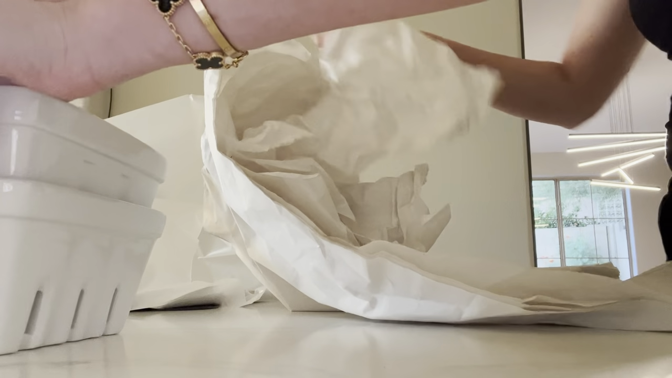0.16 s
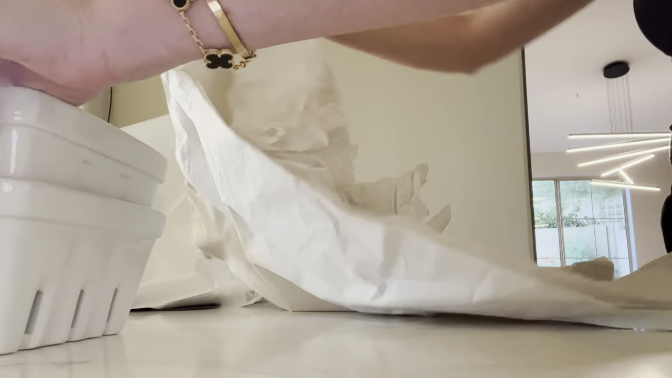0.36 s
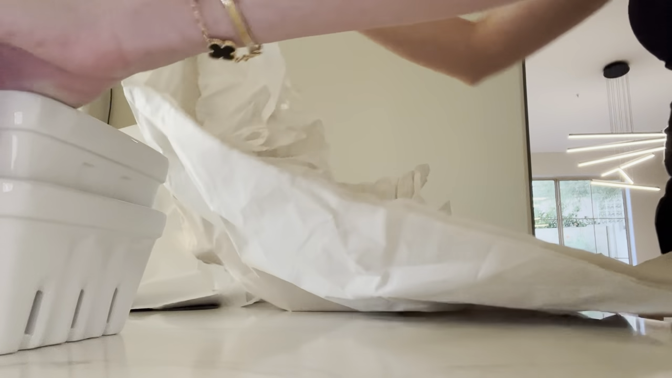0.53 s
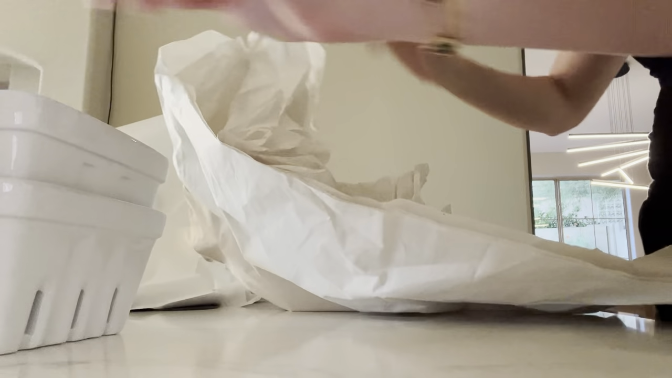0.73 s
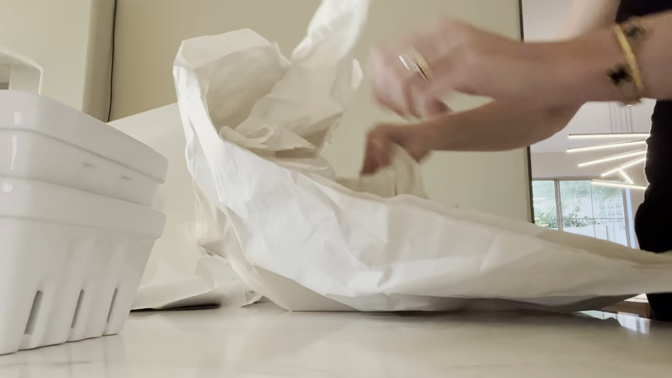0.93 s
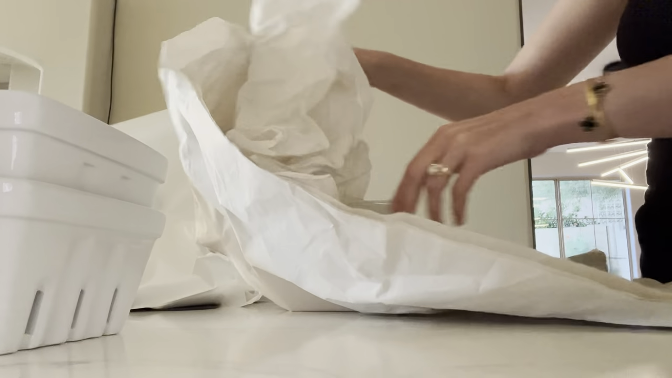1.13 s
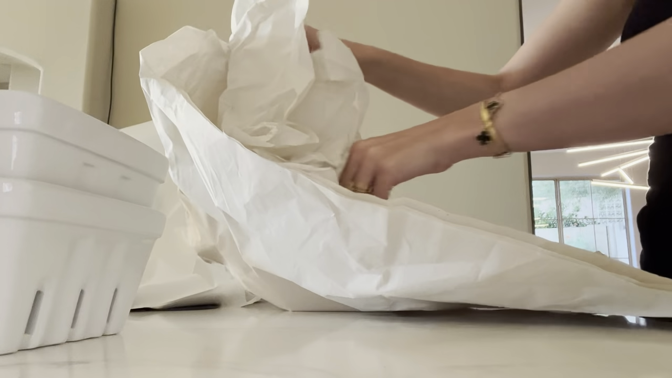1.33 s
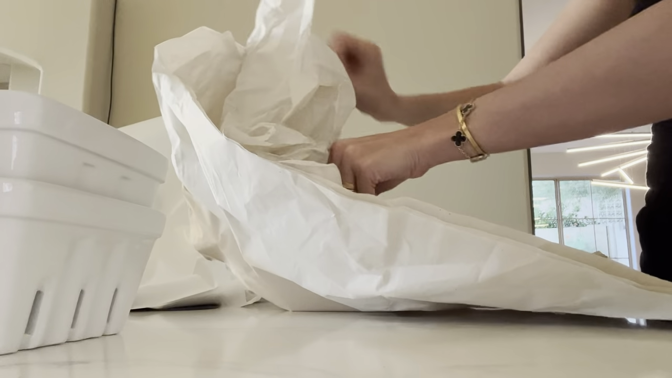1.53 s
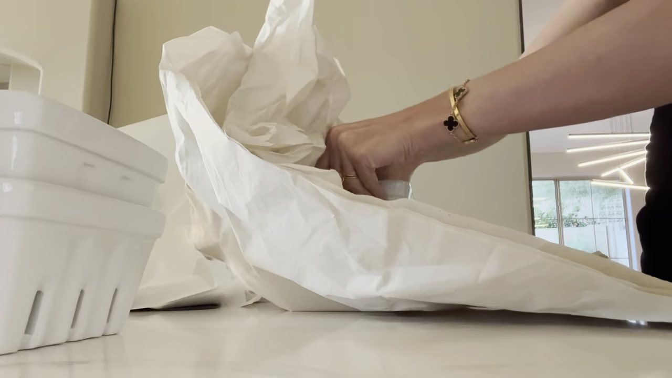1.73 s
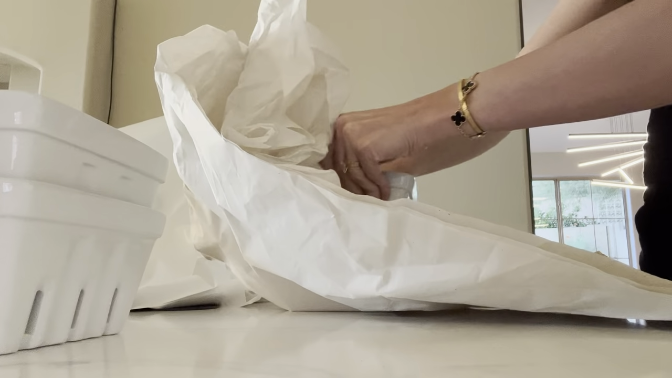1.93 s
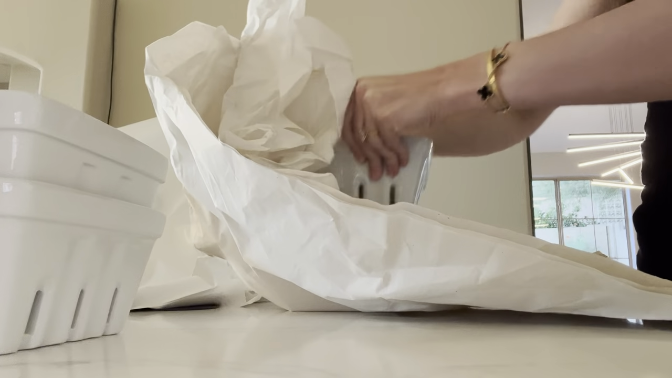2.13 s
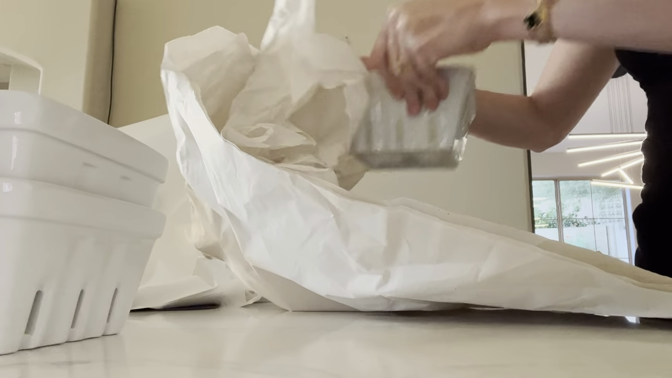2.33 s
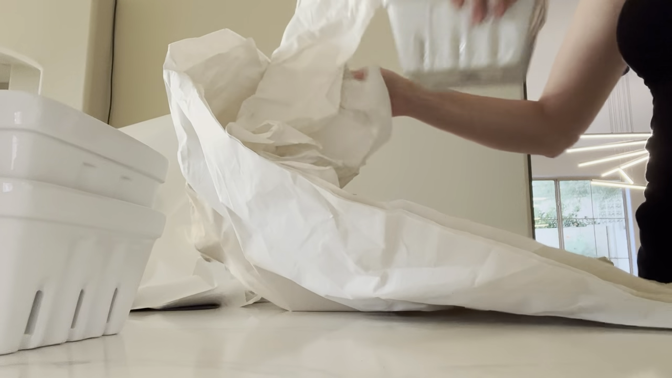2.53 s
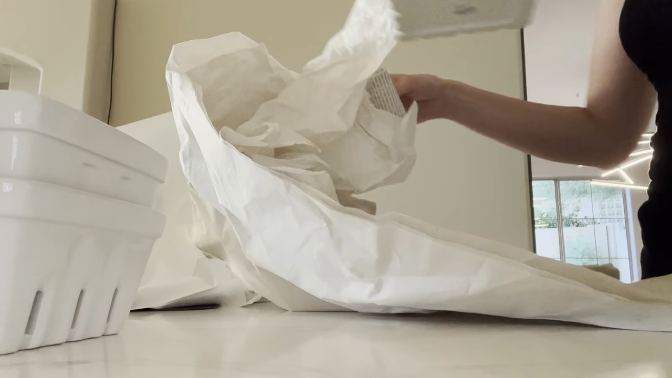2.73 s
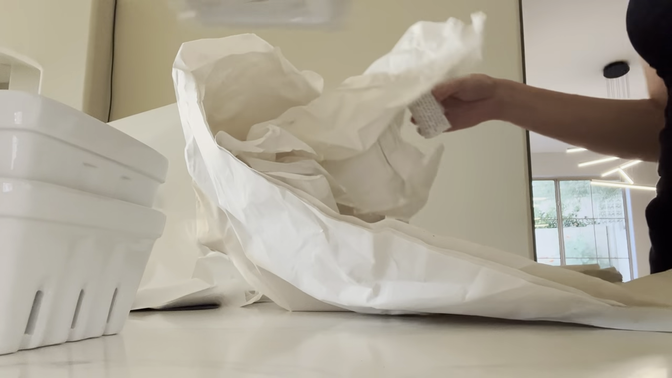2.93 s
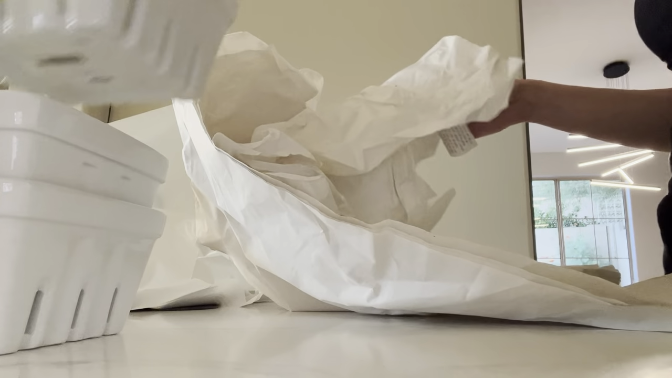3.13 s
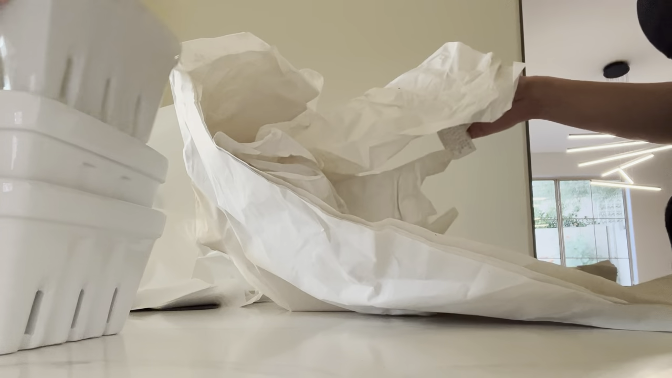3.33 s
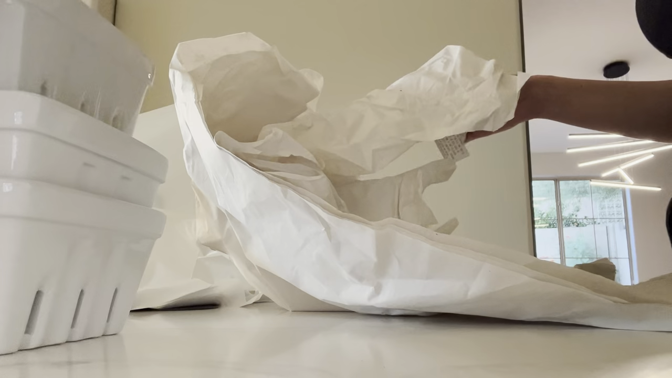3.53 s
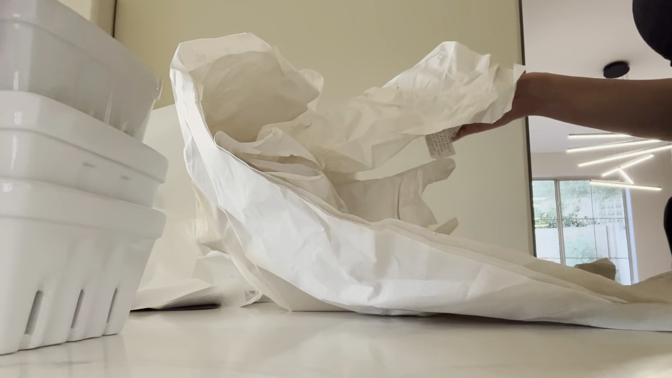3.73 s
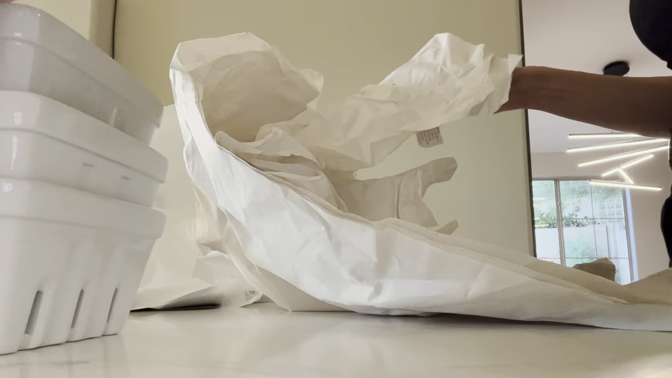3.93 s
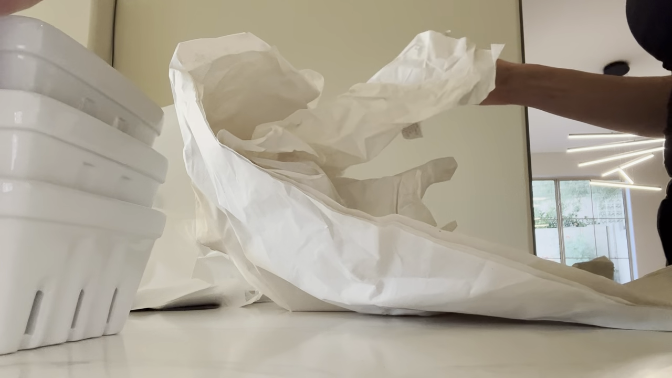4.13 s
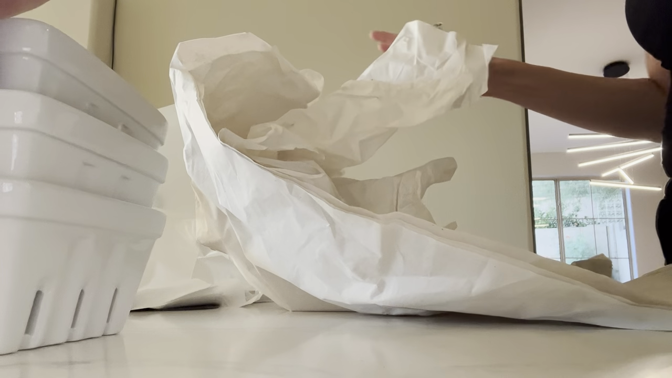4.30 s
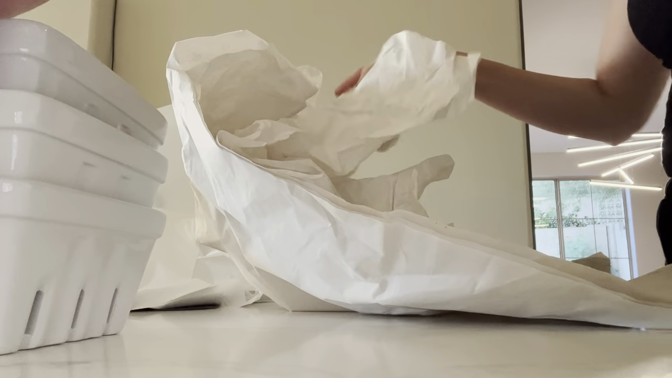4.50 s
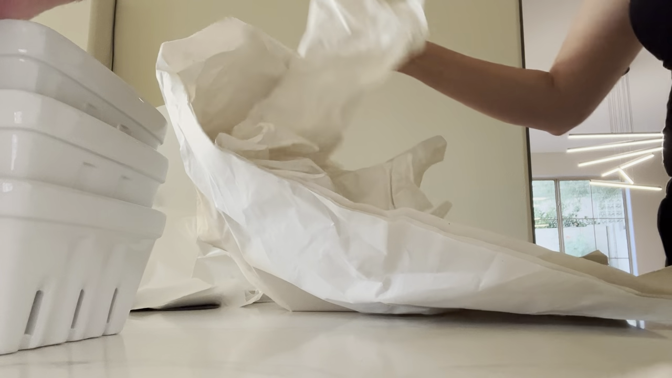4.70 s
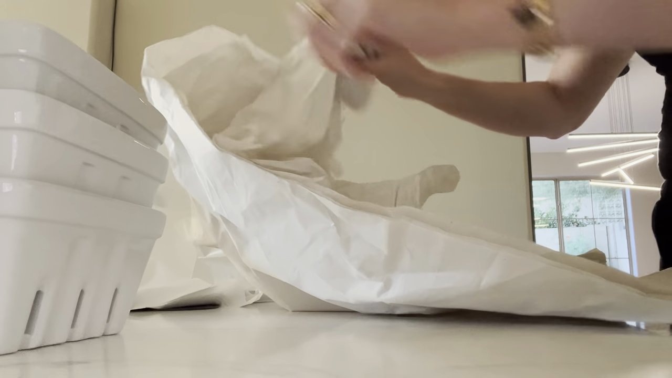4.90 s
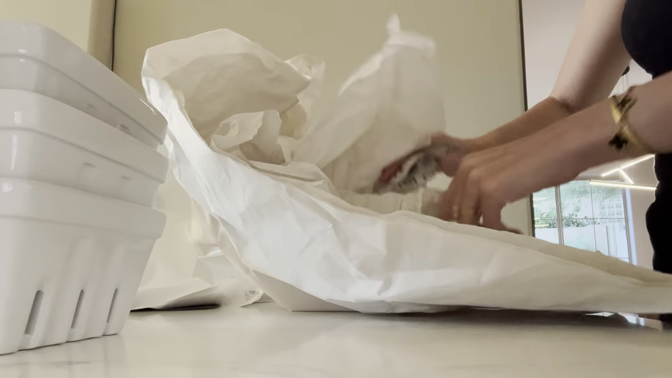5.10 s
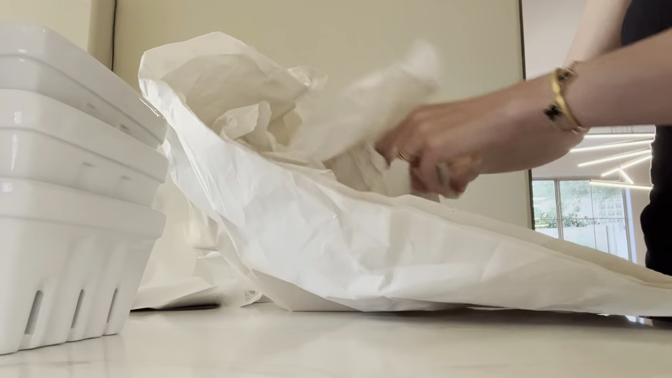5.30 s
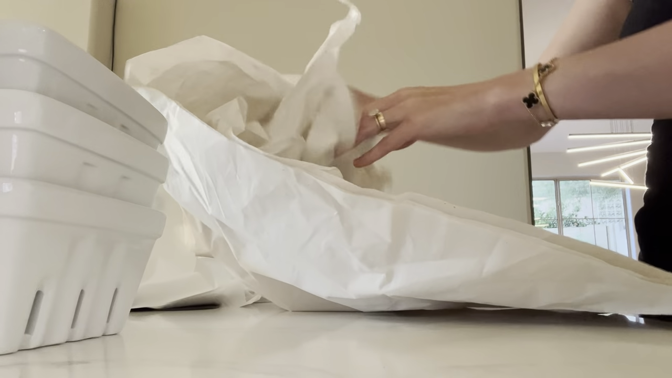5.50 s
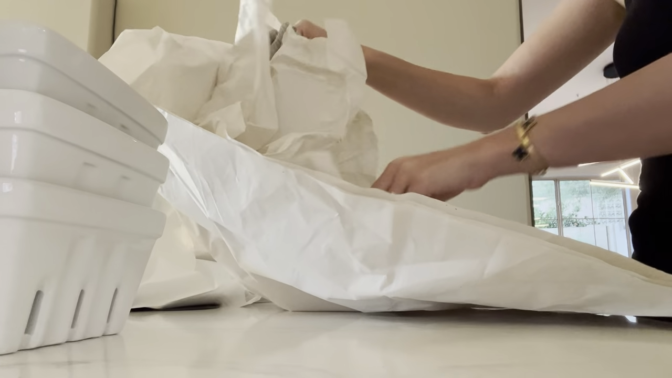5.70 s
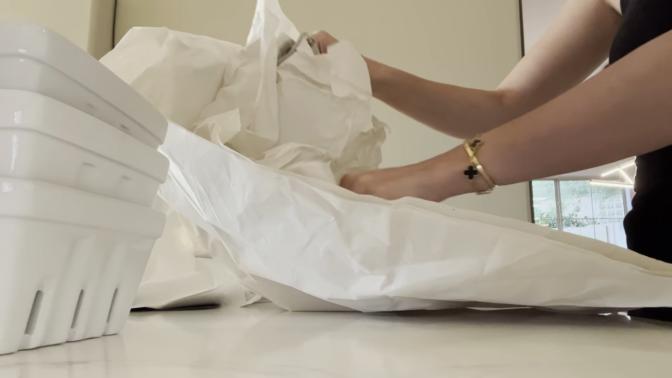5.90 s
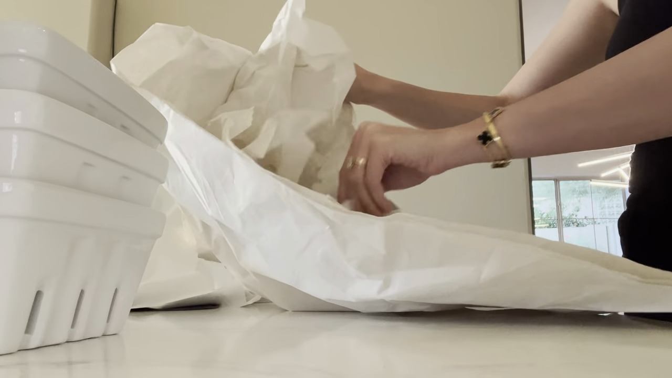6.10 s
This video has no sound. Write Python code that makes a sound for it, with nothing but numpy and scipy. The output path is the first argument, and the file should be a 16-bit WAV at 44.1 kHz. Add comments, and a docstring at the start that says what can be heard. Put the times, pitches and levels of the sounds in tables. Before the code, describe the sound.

Indoors, close to a counter: a loud ceramic knock with a quick rattle, a short stuttering squeak of a pushed basket, and crisp crumpling of big stiff paper slightly farther away. The rustle fades to faint ticks, a second basket lands and nests with ringing double clacks, then vigorous crackling returns. Low room rumble and live echo throughout.

```python
"""A glazed ceramic basket knocks on a stone counter while hands already pull and crumple big paper sheets.
Creases buckle in swarms of clicks, sheets slide, taut folds snap; a pushed basket squeaks by stick and slip.
Loose folds then flop in steps and light rubs hiss. Near 4 s a second basket lands and nests in a stack, its
modes ringing over a thud, and the paper works up to its loudest. A hard live room and low noise lie throughout.
A phone standing on the counter picks it all up at two ports."""
import sys
import numpy as np
from scipy import signal
from scipy.fft import rfft, irfft
from scipy.io import wavfile
from scipy.ndimage import uniform_filter1d

SR = 44100
rng = np.random.default_rng(int(sys.argv[2]) if len(sys.argv) > 2 else 0)


def log_audio(samples):
    """Write samples as a 16-bit WAV file to the path given in sys.argv[1]."""
    # one column per channel
    frames = np.atleast_2d(samples).T
    # limit to full scale, then quantise
    limited = np.clip(frames, -1, 1)
    pcm = np.round(limited * 32767).astype(np.int16)
    wavfile.write(sys.argv[1], SR, pcm)


N = 271211
TIME_S = np.arange(N) / SR


def gain_of(db):
    """Decibels to an amplitude factor."""
    return 10 ** (np.asarray(db) / 20)


def evened(x):
    """Scales to rms 1."""
    return x / np.sqrt(np.mean(x ** 2) + 1e-20)


def read(points, hz):
    """Interpolates a table on a log-frequency axis."""
    f, value = np.transpose(points)
    return np.interp(np.log(hz + 1), np.log(f + 1), value)


def add(mix, start_s, sound):
    """Mixes a sound in at start_s."""
    part = mix[max(round(start_s * SR), 0):][:len(sound)]
    part += sound[:len(part)]


def colour(x, points, size=4096):
    """Causal minimum-phase filter with the given spectrum: clicks keep their sharp front."""
    hz = abs(np.fft.fftfreq(size, 1 / SR))
    log_gain = np.log(gain_of(read(points, hz)))
    spectrum = np.exp(np.conj(signal.hilbert(log_gain)))
    taps = np.fft.ifft(spectrum).real[:size // 2]
    return signal.oaconvolve(x, taps)[:len(x)]


def band(x, low_hz, high_hz, order=3):
    """Butterworth band-pass."""
    edges_hz = [low_hz, min(high_hz, SR / 2 - 1)]
    return signal.sosfilt(signal.butter(order, edges_hz, "band", fs=SR, output="sos"), x)


def burst(t60_s, size=2048):
    """A puff of noise of energy 1 that dies away."""
    puff = rng.standard_normal(size) * gain_of(-60 * np.arange(size) / SR / t60_s)
    return puff / np.linalg.norm(puff)


def wander(size, rate_hz=60):
    """Slow random curve of rms about 1: low-passed noise, filter onset cut off."""
    lowpass = signal.butter(2, rate_hz, fs=SR, output="sos")
    return evened(signal.sosfilt(lowpass, rng.standard_normal(size + SR)))[-size:]


# quiet rumble of the house: f/Hz, relative density/dB per Hz
RUMBLE_SPECTRUM = [(20, -23), (40, -18.5), (60, -1), (80, 1), (105, -2), (150, -9), (215, -4.5),
                   (300, -13.5), (500, -22.5), (1000, -32), (2000, -30.5), (4000, -42), (8000, -63),
                   (15000, -68)]
RUMBLE_MID_RMS_DB = -47.5


def rumble(apart=0.34):
    """Low steady noise of the house, nearly the same at both ports."""
    mid, side = (evened(colour(noise, RUMBLE_SPECTRUM)) for noise in rng.standard_normal((2, N)))
    return gain_of(RUMBLE_MID_RMS_DB) * np.array([mid + apart * side, mid - apart * side])


def buckles(per_s, spread_db, t60_s, rub, clump_db, width, shift_db, count=48):
    """Creases give way in clumps, each facet ringing in its own band, over the smooth noise of rubbing."""
    struck = rng.random(N) < per_s / SR
    size = gain_of(spread_db * np.minimum(rng.exponential(1, N), 4)) * struck
    facet = rng.integers(0, count, N)
    clumps, *turns = (wander(size=N, rate_hz=30) for _ in range(9))
    clicks = np.zeros(N)
    for k, hz in enumerate(np.geomspace(180, 15000, count)):
        # small and large facets take turns, in groups of neighbouring pitch
        turn = turns[k * len(turns) // count]
        hits = size * (facet == k) * gain_of(shift_db * turn)
        ring = band(burst(t60_s), hz / (1 + width), hz * (1 + width), order=2)
        clicks += signal.oaconvolve(hits, ring)[:N]
    rubbing = rub * rng.standard_normal(N)
    return evened((evened(clicks) + rubbing) * gain_of(clump_db * clumps))


# pulls and squeezes of the paper, levels before the trims in paper():
# t/s, length/s, crinkle level/dB, flex re crinkle/dB, slide re crinkle/dB
GRIPS = [(0.0, 0.23, -47.5, 10.5, -7.5), (0.242, 0.12, -45.5, 5.5, -3), (0.348, 0.14, -40, 2.5, -4),
         (0.617, 0.053, -47, -4, -1.5), (0.75, 0.2, -43, 0.5, -2.5), (0.993, 0.1, -41.5, 4, 2.5),
         (1.096, 0.1, -43, 1, -9), (1.334, 0.12, -50, 5, -2), (1.506, 0.16, -48.5, 2, -5.5),
         (1.723, 0.027, -49, 3, -2), (1.848, 0.074, -46, 1, -2), (1.923, 0.24, -45.5, 2.5, -4),
         (2.089, 0.096, -40.5, 4.5, -3), (2.258, 0.28, -54, 3.5, 1), (2.55, 0.04, -58, 1, -4.5),
         (2.627, 0.14, -57.5, 3.5, -4), (2.78, 0.15, -54.5, 1, -2), (2.956, 0.098, -60, 6, -3.5),
         (3.105, 0.093, -58, 2.5, -2), (3.25, 0.12, -59.5, 4, -6), (3.688, 0.076, -52.5, -3.5, -3),
         (3.768, 0.15, -63, 4.5, 1.5), (3.947, 0.11, -49.5, 3, -1), (4.288, 0.26, -50, 5, -0.5),
         (4.6, 0.25, -48, 2, 1), (4.865, 0.12, -41, 3, -3.5), (4.988, 0.17, -41.5, 2.5, -7),
         (5.158, 0.096, -40.5, 3, -4.5), (5.289, 0.083, -42, 3, -2.5), (5.363, 0.22, -37, 4, -3),
         (5.586, 0.088, -37.5, 1.5, -7.5), (5.81, 0.099, -43, 3.5, -6.5), (5.94, 0.052, -45.5, 8.5, -3.5),
         (5.996, 0.2, -40, 3, -6)]
GRIP_ATTACK_S = 0.036  # time for the hand to close


def handling(levels_db, release_db_per_s):
    """Envelope of all grips: rises as the hand closes, holds, dies away as the sheet settles."""
    power = np.zeros(N)
    for (start_s, length_s, *_), db in zip(GRIPS, levels_db):
        rise = np.clip((TIME_S - start_s) / GRIP_ATTACK_S, 0, 1)
        since_release_s = np.maximum(TIME_S - start_s - length_s, 0)
        power += (rise * gain_of(db - release_db_per_s * since_release_s)) ** 2
    return np.sqrt(power)


# a buckling sheet: f/Hz, relative density/dB per Hz
PAPER_SPECTRUM = [(60, -21.5), (150, 0.5), (250, -1), (450, -3), (700, -2), (1000, -0.5), (1500, -2),
                  (2000, -5.5), (2700, -5), (4000, -4), (5000, -9), (6700, -12), (9000, -17.5),
                  (13500, -19), (15500, -42)]


def paper(flex_trim_db=-2, crinkle_trim_db=-1, slide_trim_db=0):
    """Large facets flap low, small creases crinkle, and sliding fibres fizz."""
    _, _, grip_db, flex_db, slide_db = np.transpose(GRIPS)
    creases = buckles(per_s=4500, spread_db=4.0, t60_s=0.011, rub=0.34, clump_db=1.1, width=0.4, shift_db=2.0)
    creases = colour(creases, PAPER_SPECTRUM)
    fibres = buckles(per_s=7200, spread_db=2.0, t60_s=0.0038, rub=0.92, clump_db=1.5, width=0.62, shift_db=2.7)
    fibres = colour(fibres, PAPER_SPECTRUM)
    flex = evened(band(creases, 103, 2680))
    flex *= handling(grip_db + flex_db + flex_trim_db, release_db_per_s=96.5)
    crinkle = evened(band(creases + 0.71 * fibres, 2545, 7100))
    crinkle *= handling(grip_db + crinkle_trim_db, release_db_per_s=117.0)
    slide = evened(band(fibres, 7600, 17400))
    slide *= handling(grip_db + slide_db + slide_trim_db, release_db_per_s=92)
    return flex + crinkle + slide


# blows: t/s, row of BASKET_MODES, ring level/dB, contact hardness/Hz,
# clack level/dB, counter thud level/dB, thud f/Hz, thud t60/s
KNOCKS = [(0.002, 0, -13.5, 4180, -4.5, -19, 158, 0.04), (0.0156, 0, -22.5, 7000, -13.5, -14, 160, 0.06),
          (0.038, 0, -25, 1500, -13, -18.5, 157, 0.043), (0.0543, 0, -39, 4000, -24, -40, 156, 0.034),
          (0.066, 0, -38, 3000, -28, -42, 156, 0.036), (3.9819, 1, -23.5, 6850, -17, -28, 277, 0.025),
          (4.0278, 1, -20, 1340, -12, -19.5, 427, 0.04), (4.2736, 2, -18, 1510, -7, -5.5, 702, 0.016),
          (4.278, 2, -20.5, 6850, -9.5, -8.5, 240, 0.02), (4.5455, 2, -39, 1520, -22.5, -14, 257, 0.028)]
# rows: first basket, second basket, nested stack; modes: f/Hz, relative level/dB, t60/s
BASKET_MODES = [
    [(568, -3, 0.076), (694, 7, 0.034), (975, 14, 0.012), (1330, -13, 0.11), (1800, 1.5, 0.05),
     (2449, 2, 0.12), (2606, -2, 0.18), (3155, -0.5, 0.059), (4075, -11, 0.16), (4447, -17, 0.2),
     (5012, -22, 0.32), (5660, -2, 0.13), (10180, -10, 0.19)],
    [(161, -10, 0.098), (579, 3.5, 0.037), (701, -4, 0.059), (800, 2, 0.028), (877, 1.5, 0.032),
     (1550, -2, 0.14), (1980, -11, 0.07), (2480, -11, 0.06), (2550, 0.5, 0.14), (2940, -0.5, 0.13),
     (4070, -10.5, 0.13), (4180, -19, 0.05), (5070, -14.5, 0.18), (5300, -9, 0.06), (5860, -8, 0.08),
     (8050, -17, 0.09), (9450, -17, 0.1)],
    [(205, 1, 0.077), (275, -0.5, 0.064), (433, 0, 0.035), (501, 10, 0.039), (565, 4, 0.042),
     (729, 2, 0.059), (833, 7, 0.038), (1130, -8, 0.022), (1156, -4, 0.023), (1558, 0.5, 0.059),
     (1800, 1.5, 0.065), (1976, 2, 0.07), (2513, 0.5, 0.062), (2617, 7.5, 0.05), (2740, 1, 0.04),
     (2915, 5.5, 0.091), (3030, -3, 0.027), (4070, -12, 0.16), (5000, -16, 0.04), (5160, -6, 0.045),
     (5660, -8, 0.038), (6400, -7, 0.091)],
]
# dull clack of ceramic on a hard base: f/Hz, relative density/dB per Hz
CLACK_SPECTRUM = [(50, -35), (170, 0), (270, 2), (370, -2.5), (600, 0.5), (850, 2), (1200, -8.5),
                  (2000, -8.5), (2800, -8), (3400, -14.5), (5500, -15.5), (7500, -11), (14000, -18)]
SLAB_HZ, SLAB_T60_S, SLAB_RE_THUD_DB = 76.8, 0.45, -19.5  # boom of the counter slab


def knocks(clack_t60_s=0.044, settle_s=0.00059, chatter=0.0047, chatter_db=2.5):
    """Blows ring basket modes and thud the counter; soft contact weakens high modes, rocking unsettles them."""
    out, t = np.zeros(N), np.arange(SR // 2) / SR
    press = 1 - np.exp(-(t / settle_s) ** 2)  # rough faces take a moment to meet fully
    for start_s, basket, ring_db, hard_hz, clack_db, thud_db, thud_hz, thud_t60_s in KNOCKS:
        ring = np.zeros(len(t))
        for k, (hz, db, t60_s) in enumerate(BASKET_MODES[round(basket)]):
            rocking = wander(size=len(t))
            # neighbouring modes start in opposite directions
            turns = np.cumsum(hz * (1 + chatter * rocking)) / SR + k / 2
            level = gain_of(db + chatter_db * rocking - 60 * t / t60_s)
            ring += level * np.sin(2 * np.pi * turns) / (1 + (hz / hard_hz) ** 2)
        softness = signal.butter(2, min(hard_hz, SR / 3), fs=SR, output="sos")
        noise = press * burst(clack_t60_s, size=len(t))
        clack = signal.sosfilt(softness, colour(noise, CLACK_SPECTRUM))
        thud = np.sin(2 * np.pi * thud_hz * t) * gain_of(-60 * t / thud_t60_s)
        thud += np.sin(2 * np.pi * SLAB_HZ * t) * gain_of(SLAB_RE_THUD_DB - 60 * t / SLAB_T60_S)
        blow = press * (gain_of(ring_db) * ring + gain_of(thud_db) * thud)
        add(out, start_s, blow + gain_of(clack_db) * clack / abs(clack).max())
    return band(out, 93.0, 15000, order=2)


# single creases that snap, levels before the trims in snaps():
# t/s, tick level/dB, flap level/dB, fold f/Hz
SNAPS = [(0.1026, -33.5, -44, 3000), (0.256, -37, -36, 3000), (0.2752, -32.5, -34, 4500),
         (0.3026, -34.5, -39, 3000), (0.3756, -31, -41, 2500), (0.395, -32, -26, 1500),
         (0.423, -29, -43, 3000), (1.0012, -47, -46, 3000), (1.0287, -18.5, -43, 3000),
         (1.037, -38, -33, 3200), (1.1282, -36, -22.5, 1300), (1.3351, -47, -30.5, 2870),
         (1.3484, -29, -46, 3000), (1.371, -27, -50, 3020), (1.624, -39, -31, 1420), (1.709, -50, -29, 890),
         (1.7453, -44, -28.5, 2470), (1.893, -41, -31.5, 3340), (1.942, -42, -30, 2960),
         (1.953, -42, -30, 1440), (2.0189, -36, -39, 840), (2.0637, -41, -26, 1210),
         (2.1364, -33, -26.5, 1500), (2.383, -29.5, -37, 3980), (2.445, -36, -46, 2980),
         (2.486, -35, -52, 3000), (2.7329, -52, -37.5, 1080), (2.786, -54, -41, 2700),
         (2.935, -40, -48, 3000), (3.2115, -41, -50, 3000), (3.336, -54, -50, 2700),
         (3.4145, -58, -44, 1190), (3.7626, -34.5, -41, 2900), (3.961, -35.5, -52, 1500),
         (3.973, -51, -47, 1500), (4.094, -36, -44, 5000), (4.3303, -36, -31, 4050),
         (4.455, -33, -49, 3000), (4.538, -41, -26.5, 1900), (4.5578, -39, -30.5, 3200),
         (4.676, -25.5, -31, 4500), (4.8968, -34, -42, 2500), (4.9152, -26, -36, 3500),
         (4.931, -24, -26, 900), (5.0016, -29.5, -38, 3020), (5.08, -33, -32, 3000), (5.133, -34, -29, 910),
         (5.151, -32, -22.5, 1470), (5.217, -30, -39, 2500), (5.2685, -37, -40, 3000),
         (5.5274, -23, -22.5, 2500), (5.705, -43, -39, 1030), (5.7178, -45, -22, 4260),
         (5.781, -39, -27.5, 2480), (5.856, -44, -25, 2460), (5.861, -44, -23, 1520),
         (5.888, -34, -30.5, 1016), (5.902, -33, -20.5, 2300), (6.009, -44, -24, 1140)]


def snaps(tick_trim_db=3, flap_trim_db=1, fold_ring=1.6, fold_width=0.2):
    """A taut crease flips: a bright tick and a short flap of the sheet, coloured by the size of the fold."""
    out = np.zeros(N)
    for start_s, tick_db, flap_db, hz in SNAPS:
        tick = band(burst(t60_s=0.017), 6900, 13400, order=2)
        sheet = band(colour(burst(t60_s=0.029), PAPER_SPECTRUM), 330, 5400, order=2)
        fold = band(burst(t60_s=0.017), hz / (1 + fold_width), hz * (1 + fold_width), order=1)
        flap = evened(sheet) + fold_ring * evened(fold)
        add(out, start_s, gain_of(tick_db + tick_trim_db) * tick / abs(tick).max())
        add(out, start_s, gain_of(flap_db + flap_trim_db) * flap / abs(flap).max())
    return out


# a pushed basket catching and slipping: t/s, length/s, final level/dB, swell/dB (negative fades),
# base slip rate/Hz, final slowing/share, slip hardness/Hz
PUSHES = [(0.41, 0.056, -21, 16.5, 369, 0.22, 3500), (0.478, 0.045, -36.5, -4, 355, 0.038, 1500),
          (0.79, 0.043, -41, 1.5, 277, 0.02, 598), (0.85, 0.028, -38.5, -1, 283, 0.085, 800),
          (0.897, 0.032, -34.5, -1, 258, 0.035, 800)]
# what the slips shake: f/Hz, gain/dB
SQUEAK_BODY = [(40, -38), (120, -14), (200, 1), (300, 0.5), (380, -8.5), (680, -8), (1100, -14.5),
               (1400, -30), (1800, -7), (2100, -30), (2450, -8.5), (3000, -42), (6000, -49)]
PUSH_ATTACK_S, PUSH_RELEASE_S = 0.0032, 0.0093
PUSH_ARCH = 0.025  # share by which slips quicken in mid-push
SAG_POWER = 5  # slips slow down only just before the basket sticks


def squeak(jitter=0.014, uneven_db=1.5, grit=0.15):
    """Stick and slip: uneven, gritty jerks shake the basket, slowing until it sticks."""
    out = np.zeros(N)
    for start_s, length_s, db, swell_db, rate_hz, sag, hard_hz in PUSHES:
        t = np.arange(0, length_s + PUSH_RELEASE_S, 1 / SR)
        progress = np.minimum(t / length_s, 1)
        drift, catch = evened(uniform_filter1d(rng.standard_normal((2, SR)), size=220))[:, :len(t)]
        glide = 1 + PUSH_ARCH * np.sin(np.pi * progress) - sag * progress ** SAG_POWER
        hz = rate_hz * glide * (1 + jitter * drift)
        slips = np.diff(np.floor(np.cumsum(hz) / SR), prepend=0)  # 1 at each slip
        jerks = evened(slips - hz / SR)
        drive = (jerks + grit * rng.standard_normal(SR)[:len(t)]) * gain_of(uneven_db * catch)
        gate = np.minimum(t / PUSH_ATTACK_S, 1) * np.minimum((t[-1] - t) / PUSH_RELEASE_S, 1)
        shaken = evened(band(colour(drive, SQUEAK_BODY), 60, hard_hz, order=2))
        add(out, start_s, shaken * gate * gain_of(db - swell_db * (1 - progress)))
    return out


# broad, loose folds that flop over: t/s, first-step level/dB, first-step f/Hz
FLOPS = [(1.372, -39, 875), (1.395, -35.5, 600), (1.528, -38, 705), (1.676, -35, 1190), (1.828, -40, 1020),
         (1.941, -37, 726), (1.986, -34, 820), (2.04, -31, 1100), (2.103, -29, 760), (2.279, -35, 780),
         (2.306, -33, 730), (2.422, -33, 2200), (2.532, -45, 760), (2.58, -38, 2000), (2.648, -42, 800),
         (2.68, -45, 690), (2.821, -42, 1900), (2.883, -39, 2800), (2.975, -42, 2200), (3.02, -43.5, 1210),
         (3.04, -42, 1800), (3.185, -42, 1410), (3.284, -42, 890), (3.372, -45, 2400), (3.416, -38.5, 820),
         (5.031, -30, 860), (5.114, -33, 990), (5.184, -34, 2500), (5.233, -27, 3300), (5.298, -31, 970),
         (5.335, -27, 860), (5.366, -27, 800), (5.408, -26, 880), (5.453, -26, 1080), (5.614, -27, 1700),
         (5.659, -25, 2400), (5.686, -25, 2800), (5.948, -31, 870), (5.969, -33, 1050), (6.014, -31, 2400),
         (6.125, -31, 840)]


def flops(trim_db=0, ring_t60_s=0.015, fold_width=0.2, step_s=0.004, fade_db=5.5, scatter=0.42, count=3):
    """A loose fold gives way in a few quick steps, each weaker than the last and of another pitch."""
    out = np.zeros(N)
    for at_s, db, hz in FLOPS:
        for k in range(count):
            crack = band(burst(ring_t60_s), hz / (1 + fold_width), hz * (1 + fold_width), order=1)
            add(out, at_s, gain_of(db + trim_db - fade_db * k) * crack / abs(crack).max())
            at_s += step_s * rng.uniform(.5, 2.5)
            hz *= np.exp(scatter * rng.uniform(-0.73, 2.8))
    return out


# light rubs: t/s, length/s, level/dB, f/Hz, relative half-width
RUBS = [(2.774, 0.054, -61, 6050, 0.018), (3.695, 0.085, -57, 3030, 0.11)]
RUB_EDGE_S = 0.018  # time for the surfaces to meet and to part


def rubs():
    """Two surfaces brush past each other and briefly hiss in one narrow band."""
    out = np.zeros(N)
    for start_s, length_s, db, hz, width in RUBS:
        t = np.arange(0, length_s, 1 / SR)
        noise = rng.standard_normal(SR)
        hiss = evened(band(noise, hz / (1 + width), hz * (1 + width), order=2))[:len(t)]
        edges = np.minimum(np.minimum(t, length_s - t) / RUB_EDGE_S, 1)
        add(out, start_s, gain_of(db) * hiss * edges)
    return out


# decay of the room: f/Hz, t60/s
ROOM_T60 = [(150, 0.55), (300, 1.33), (500, 0.7), (1000, 1.05), (2500, 1.22), (5000, 0.92), (9000, 0.047),
            (14000, 0.1)]
ROOM_MONO_HZ = 268  # below this the echo is nearly the same at both ports


def room(x, echo_levels, flutter_s=.00683, flutter=0.09, order=12):
    """Dense reflections differ by port, bands die at their own speed; two facing surfaces add one repeat."""
    taps = rng.choice([-1., 1.], (2, SR)) * (rng.random((2, SR)) < 1 / order)
    taps *= np.arange(SR) > .003 * SR  # first reflection after 3 ms
    hz, t, z = signal.stft(taps, SR, nperseg=256)
    same = 1 / (1 + (hz[:, None] / ROOM_MONO_HZ) ** 4)
    z[1] = same * z[0] + np.sqrt(1 - same ** 2) * z[1]
    decay = gain_of(-60 * t / read(ROOM_T60, hz)[:, None])
    decay *= gain_of(read(echo_levels, hz))[:, None] / np.sqrt(np.mean(decay ** 2, axis=1, keepdims=True))
    tail = signal.istft(z * decay, SR, nperseg=256)[1] / np.linalg.norm(taps[0])
    repeat = np.roll(tail, round(flutter_s * SR), axis=1)
    tail = (tail + flutter * repeat) / np.hypot(1, flutter)
    return signal.fftconvolve(x[None], tail, axes=1)[:, :N]


def ports(x, phase, balance, echo_levels):
    """Direct sound reaches the two ports out of step; the room follows, and the phone shades one side."""
    hz = np.fft.rfftfreq(2 * N, 1 / SR)
    side = np.array([[.5], [-.5]])
    direct = rfft(x, 2 * N) * np.exp(1j * side * read(phase, hz))
    echo = rfft(room(x, echo_levels), 2 * N)
    return irfft((direct + echo) * gain_of(side * read(balance, hz)))[:, :N]


# phase between ports, for paper and baskets: f/Hz, left lead/rad
PAPER_PHASE = [(20, 0), (1000, 0), (2000, -1.5), (3300, -.9), (4300, -3.3), (5300, -6), (6300, -4),
               (7600, -3.1), (9300, -1.9), (11200, -.1), (12300, .2), (13400, 1.4), (15000, 3.1)]
BASKET_PHASE = [(150, -0.5), (380, 1), (690, 2.5), (900, -1), (1300, 1.1), (1800, 2), (2700, 2), (4300, 2),
                (5500, 1), (7000, 3.5), (11000, 1.5)]
# balance of the ports, for paper and baskets: f/Hz, left minus right/dB
PAPER_BALANCE = [(60, -5), (130, -11.5), (250, -6.5), (700, -8), (1300, -4.5), (2400, -2), (4400, -10.5),
                 (8000, -2), (15000, 1)]
BASKET_BALANCE = [(150, -2), (480, -6.5), (860, 3.5), (1200, -6.5), (1600, 9.5), (2700, -7), (4300, 5),
                  (5000, -14.5), (6500, 2.5), (14000, -3)]
# echo against direct sound, for paper and the nearer baskets: f/Hz, level/dB
PAPER_ECHO = [(60, 4.5), (140, -5.5), (300, -0.5), (450, -2), (800, 1.5), (1400, -2.5), (2000, -4.5),
              (3000, -4), (5500, -6), (8000, -7.5), (14000, -7.5)]
BASKET_ECHO = [(60, -0.5), (140, -15.5), (280, -6), (450, -4.5), (800, -4.5), (1100, -6.5), (1550, -9),
               (2500, -10), (3000, -18.5), (4400, -11), (5700, -13.5), (14000, -2)]


def scene():
    """The paper lies a little way off; the baskets stand right beside the phone."""
    sheets = ports(paper() + snaps() + flops() + rubs(), PAPER_PHASE, PAPER_BALANCE, PAPER_ECHO)
    baskets = ports(knocks() + squeak(), BASKET_PHASE, BASKET_BALANCE, BASKET_ECHO)
    return sheets + baskets + rumble()


CEILING, EDGE_HZ = 1.15, 15200  # soft peak limit (full scale 1), low-pass edge


def record(dry):
    """The phone rounds off the highest peaks, then limits the band."""
    rounded = CEILING * np.tanh(dry / CEILING)
    lowpass = signal.firwin(255, EDGE_HZ, window=("kaiser", 9), fs=SR)
    return signal.oaconvolve(rounded, lowpass[None], "same")


dry = scene()
out = record(dry)
log_audio(out)
```